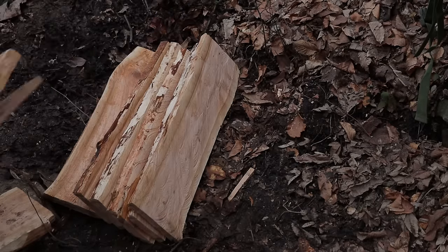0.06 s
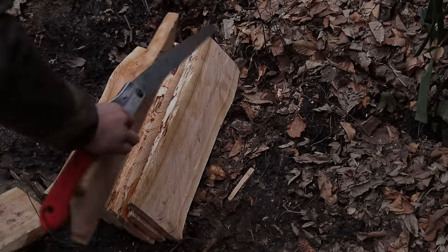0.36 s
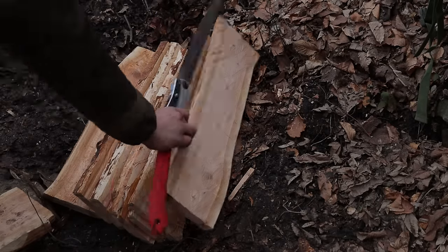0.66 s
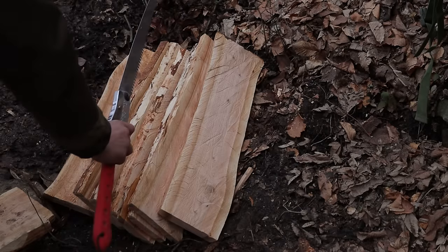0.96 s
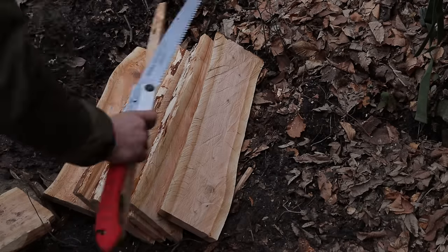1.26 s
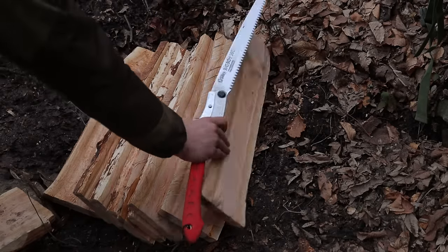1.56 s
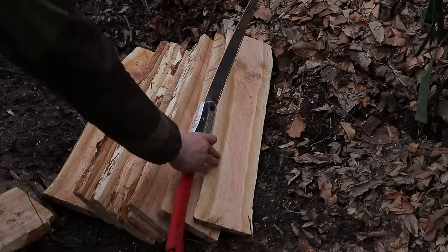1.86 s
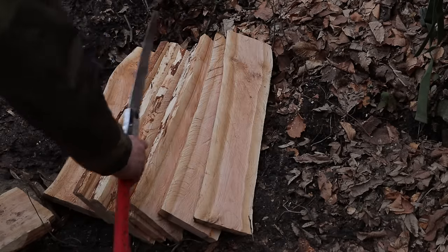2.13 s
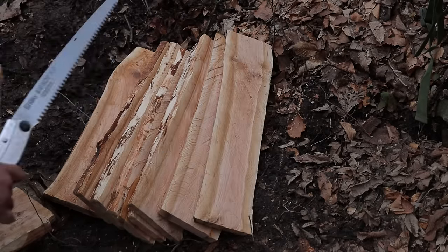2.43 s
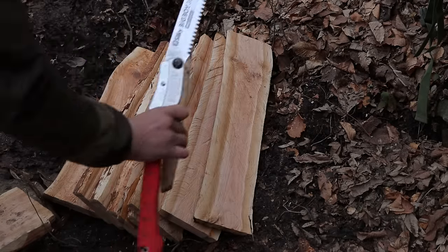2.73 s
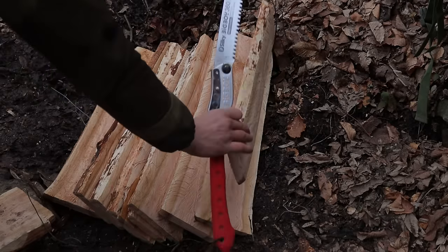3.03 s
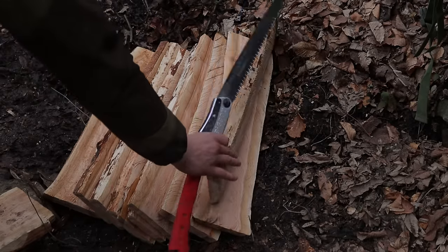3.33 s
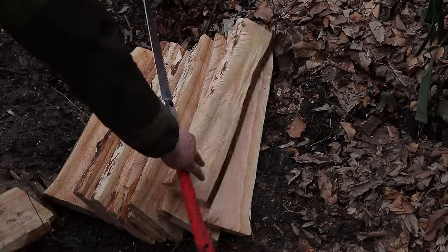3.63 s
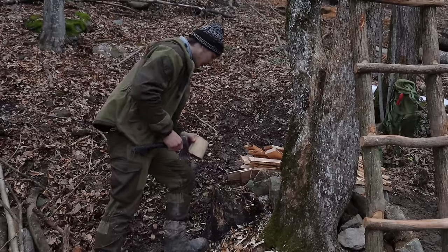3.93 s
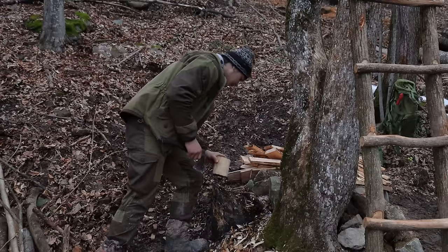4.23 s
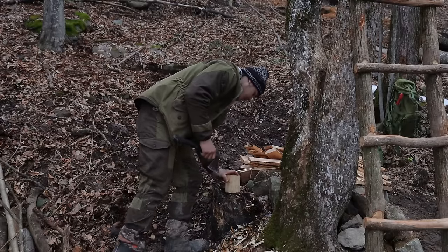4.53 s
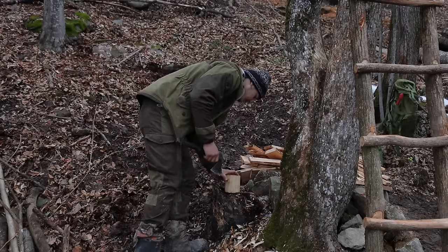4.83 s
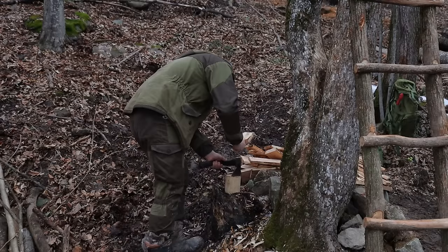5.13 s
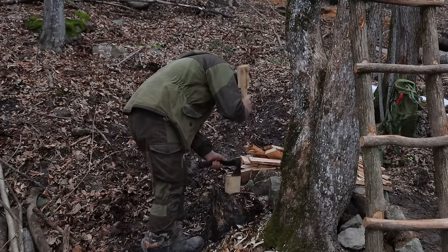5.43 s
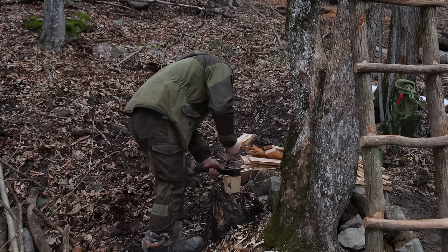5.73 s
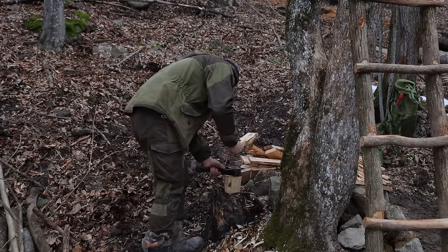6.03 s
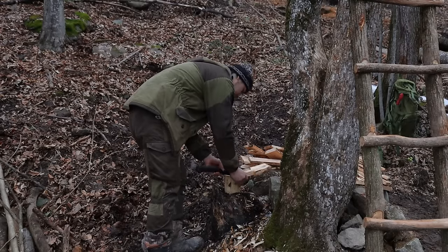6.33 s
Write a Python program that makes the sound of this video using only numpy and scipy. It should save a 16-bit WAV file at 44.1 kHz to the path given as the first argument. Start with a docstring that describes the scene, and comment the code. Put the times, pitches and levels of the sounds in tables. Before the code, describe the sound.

Close to the microphone, a sleeve brushes softly while split boards are stacked. At 0.7 seconds wood slides and a hand saw scrapes, followed by a hollow, ringing knock at 0.8. A second slide ends in a loud cluster of knocks around 1.7, and the saw blade clinks thinly until about 2 seconds. Light taps and rubs lead to smaller knocks and scrapes from 3.1 to 3.3, then a firm knock at 3.65.

After a split second of silence at 3.7, the sound is further off in a quiet forest. The microphone sways with a brief deep rumble, and a boot shifts faintly in dry leaves. A hatchet is set on a billet with a dull thump at 4.65, followed by softer bumps and one faint bird chirp. At 5.6 a loud, dry crack splits the wood and echoes away. Everything is on the left; the right carries faint hiss.

```python
"""Split boards slide and knock onto a stack; a sleeve brushes, and a saw in the same hand scrapes and rings.
At 3.7 s a brief silence leads to a second scene, further off in the forest: the microphone mount sways,
a boot shifts in dry leaves, a hatchet is set on a billet and a bird chirps faintly. At 5.6 s the billet
is struck and splits, and the hillside echoes. One microphone feeds the left channel; the right is
almost only hiss. A limiter ducks both after the loud blows."""
import sys
import numpy as np
from scipy import signal
from scipy.fft import rfft, irfft
from scipy.io import wavfile

SR = 44100
rng = np.random.default_rng(int(sys.argv[2]) if len(sys.argv) > 2 else 0)


def pcm_store(signal):
    """Save signal as 16-bit PCM."""
    levels = np.round(np.clip(np.atleast_2d(signal), -1, 1) * 32767)
    wavfile.write(sys.argv[1], SR, levels.astype(np.int16).T)


N = 285768
TIME = np.arange(N) / SR
EVENT_TIME = TIME[:SR]
GAP_S = (3.715, 3.747)  # silence between the two scenes


def amp(db):
    """Decibels to gain."""
    return 10 ** (np.asarray(db) / 20)


def unit_rms(x):
    """Scales to rms 1."""
    return x / np.sqrt(np.mean(x ** 2) + 1e-20)


def add(mix, start_s, sound):
    """Mixes a sound in at start_s."""
    part = mix[max(round(start_s * SR), 0):][:len(sound)]
    part += sound[:len(part)]


def colour(x, spectrum):
    """Filters x by a curve of (Hz, dB) points; rms 1."""
    hz, db = np.transpose(spectrum)
    bins_hz = np.fft.rfftfreq(len(x), 1 / SR)
    gain = amp(np.interp(np.log(bins_hz + 1), np.log(hz), db))
    return unit_rms(irfft(rfft(x) * gain, len(x)))


def burst(spectrum, t60_s, rise_s=0.00023):
    """Decaying coloured noise: many modes too close to tell apart."""
    envelope = amp(-60 * EVENT_TIME / t60_s) * (1 - np.exp(-EVENT_TIME / rise_s))
    return envelope * colour(rng.standard_normal(SR), spectrum)


def ring(modes, t60_factor=1, t=EVENT_TIME):
    """Damped sines of alternating sign."""
    return sum((-1) ** k * amp(db - 60 * t / (t60_s * t60_factor)) * np.sin(2 * np.pi * hz * t)
               for k, (hz, db, t60_s) in enumerate(modes))


def grains(per_s, spread_db):
    """Random catches of a rough surface, uneven in size."""
    size = amp(spread_db * np.minimum(rng.exponential(1, N), 4))
    return unit_rms(rng.standard_normal(N) * size * (rng.random(N) < per_s / SR))


def stroke(start_s, length_s, bite_s=0.0053, press_db_per_s=110, release_db_per_s=550):
    """Gain of a rubbing stroke: it bites, presses harder until the wood stops, then dies away."""
    t = np.maximum(TIME - start_s, 0)
    db = np.minimum(press_db_per_s * (t - length_s), release_db_per_s * (length_s - t))
    return (1 - np.exp(-t / bite_s)) * amp(np.maximum(db, -200))


def swells(moves):
    """Gain of unhurried movements: each speeds up and slows down in a bell."""
    return sum(amp(db) / (1 + ((TIME - middle_s) / half_s) ** 2 / 2) ** 2
               for middle_s, half_s, db in moves)


# Each row: frequency in Hz, level in dB.
HISS_SPECTRUM = [(20, -31), (100, 1.5), (400, -2), (1200, -6), (3000, -8), (16000, -11.5)]


def input_hiss(level_db=-56):
    """Independent steady noise in each of the two inputs."""
    return amp(level_db) * np.array([colour(z, HISS_SPECTRUM) for z in rng.standard_normal((2, N))])


# Each row: frequency in Hz, level in dB.
AIR_SPECTRUM = [(20, -0.5), (60, 5), (150, -4), (400, -4.5), (1200, -5.5), (2200, -11), (3500, -17),
                (8000, -20.5), (12000, -35), (16000, -29)]


def forest_air(level_db=-48.5):
    """Steady, mostly low noise of the forest."""
    return amp(level_db) * colour(rng.standard_normal(N), AIR_SPECTRUM)


# Each row: time in seconds, pitch in Hz, level in dB.
CHIRP_CONTOUR = [(4.785, 3950, -66), (4.809, 4180, -50), (4.84, 4250, -53), (4.86, 4250, -57)]


def bird():
    """One thin, rising note from a small bird far off."""
    times_s, hz, db = np.transpose(CHIRP_CONTOUR)
    sounding = (TIME >= times_s[0]) & (TIME <= times_s[-1])
    phase = 2 * np.pi * np.cumsum(np.interp(TIME, times_s, hz)) / SR
    return sounding * amp(np.interp(TIME, times_s, db)) * np.sin(phase)


# Each row: frequency in Hz, level in dB, t60 in seconds.
MOUNT_MODES = [(22.7, -11, 0.24), (25.14, -32, 5.1), (28.5, -57, 1.4)]


def mount_sway(start_s=3.747, settle_after_s=(0.45, 0.75)):
    """The microphone mount wobbles until friction stops the last small swings."""
    out = np.zeros(N)
    settling = np.interp(TIME, settle_after_s, [1, 0])
    add(out, start_s, -ring(MOUNT_MODES, t=TIME) * settling)
    return out


# Each row: middle in seconds, half length in seconds, level in dB.
BOOT_SHIFTS = [(3.77, 0.028, -48.5), (4.32, 0.15, -48.5), (4.82, 0.2, -51.5), (6.34, 0.076, -51)]
# Each row: frequency in Hz, level in dB.
LEAF_SPECTRUM = [(150, -7), (500, 7.5), (1500, -0.5), (3000, -5.5), (7500, -7.5), (11000, -15),
                 (16000, -19)]


def leaves():
    """Dry litter crackles under a shifting boot."""
    return swells(BOOT_SHIFTS) * colour(grains(per_s=2500, spread_db=-0.5), LEAF_SPECTRUM)


# Each row: middle in seconds, half length in seconds, level in dB.
ARM_REACHES = [(.7, 0.078, -40.5), (1.65, 0.19, -41), (2.1, 0.27, -47), (3.05, 0.26, -44.5),
               (3.58, 0.14, -46)]
# Each row: frequency in Hz, level in dB.
CLOTH_SPECTRUM = [(100, -21), (400, -4.5), (900, 0), (1700, -3.5), (2800, -4.5), (4200, -6), (8000, -8.5),
                  (11000, -18), (16000, -17.5)]


def sleeve(creases_db=1.5, rest_db=-53):
    """Stiff cloth brushes and creases with each reach, close by; first scene only."""
    creases = colour(rng.standard_normal(N), [(3, -6), (15, -1), (40, -5), (200, -40)])
    effort = np.hypot(swells(ARM_REACHES), amp(rest_db)) * (TIME < GAP_S[0])
    catches = grains(per_s=8000, spread_db=2.0) * amp(creases_db * creases)
    return effort * colour(catches, CLOTH_SPECTRUM)


# Each row: start in seconds, level in dB, centre in Hz, t60 in seconds.
LIGHT_TAPS = [(0.553, -37, 1200, 0.097), (0.596, -29.5, 510, 0.026), (1.031, -41, 9000, 0.018),
              (1.101, -39.5, 6800, 0.042), (1.269, -27, 500, 0.019), (1.354, -33, 2440, .02),
              (1.802, -13.5, 3500, 0.018), (1.842, -24, 2290, 0.071), (2.482, -37.5, 12000, .025),
              (2.741, -33.5, 860, 0.06), (2.928, -29.5, 800, 0.053), (2.983, -24, 795, 0.04),
              (3.002, -24.5, 600, 0.014), (3.087, -25.5, 1320, 0.059), (4.8344, -21.5, 8900, 0.0081),
              (5.602, -29.5, 697, 0.033), (5.802, -30.5, 8820, 0.015), (6.067, -37.5, 3970, 0.026)]


def taps(below_db=-14, above_db=-26):
    """Taps and snaps of wood and dry leaves: one broad, quickly damped resonance each."""
    out = np.zeros(N)
    for start_s, db, hz, t60_s in LIGHT_TAPS:
        hump = [(hz / 4, below_db), (hz / 0.94, 0), (hz * 1.07, 0), (hz * 3, above_db), (hz * 20, -60)]
        add(out, start_s, amp(db) * burst(hump, t60_s))
    return out


# Each row: start in seconds, level in dB, pitch in Hz, t60 in seconds.
DULL_THUMPS = [(0.284, -36, 240, 0.071), (3.375, -25.5, 310, 0.046), (4.649, -11.5, 222, 0.027),
               (4.655, -16.5, 131, 0.057), (4.86, -25.5, 230, 0.021), (4.874, -23, 190, 0.012),
               (4.909, -29.5, 171, 0.033), (4.961, -25.5, 173, 0.03)]


def thumps(puff_db=-9, swing_rise_s=0.00084):
    """Soft blows on block and ground: a few low swings and a puff of crushed litter."""
    out = np.zeros(N)
    puff_spectrum = [(50, -56), (150, 21), (330, 0), (600, -17), (2000, -19), (16000, -30)]
    for start_s, db, hz, t60_s in DULL_THUMPS:
        swing = ring([(hz, 0, t60_s)]) * (1 - np.exp(-EVENT_TIME / swing_rise_s))
        puff = burst(puff_spectrum, t60_s, rise_s=0.0005)
        add(out, start_s, amp(db) * (amp(puff_db) * puff - swing))
    return out


# Each row: start in seconds, level in dB, t60 in seconds, pitch factor.
HILLSIDE_ECHOES = [(5.104, -29.5, 0.9, 1.08), (5.619, -5.5, 0.096, 1.17), (5.64, -27, 0.73, 1.12),
                   (5.75, -32, 0.99, 1.01), (5.751, -24.5, 0.17, 0.96)]
# Far and near wash. Each row: frequency in Hz, level in dB.
HILLSIDE_SPECTRUM = [(100, -29), (350, -23), (750, -8.5), (1150, 0.5), (1600, -5.5), (2600, -20),
                     (5500, -28), (9000, -41), (16000, -61)]
NEAR_SPECTRUM = [(100, -14), (350, -7), (700, -1.5), (1200, 4.5), (2400, -10), (5800, -13.5), (8500, -24),
                 (16000, -39)]


def echoes(near_start_s=5.63, near_db=-22):
    """Trees and hillside smear blows into a dull wash; ground and near trunks add a wider one."""
    out = np.zeros(N)
    for start_s, db, t60_s, pitch_factor in HILLSIDE_ECHOES:
        spectrum = np.array(HILLSIDE_SPECTRUM) * [pitch_factor, 1]
        add(out, start_s, amp(db) * burst(spectrum, t60_s, rise_s=0.002))
    add(out, near_start_s, amp(near_db) * burst(NEAR_SPECTRUM, t60_s=0.55, rise_s=0.014))
    return out


# Each row: frequency in Hz, level in dB, base t60 in seconds.
BLADE_MODES = [(1450, -8, .08), (1850, -7, .08), (2735, -7, .12), (4450, -12, .8), (4988, -3, .2),
               (5534, -3.5, .28), (6140, -10, .16), (6764, -6, .14), (7470, -1, .17), (7660, -4, .17),
               (7950, -6, .17), (8096, -4, .19), (8613, -6, .15), (9300, -8, .13), (9503, -1, .11),
               (10150, -8, .1), (10990, -12, .12), (12030, -12, .14), (12670, -7, .08), (13460, -9, .1),
               (14150, -8, .07)]
# Each row: start in seconds, ring in dB, ring t60 factor, rattle in dB, rattle t60 in seconds.
BLADE_BUMPS = [(.846, -32, 1, -31, 0.066), (.862, -51, 0.38, -33, 0.076), (1.812, -34, 0.57, -25.5, 0.075),
               (1.883, -34, .7, -36, 0.1), (2.0017, -24, .55, -23, 0.085), (2.029, -36, 0.44, -38.5, 0.41)]
# Each row: frequency in Hz, level in dB.
RATTLE_SPECTRUM = [(200, -41), (700, -6), (1500, -4.5), (2700, -1.5), (4000, -4), (5500, -4), (8000, -7),
                   (10000, -17), (13500, -10), (16000, -24)]


def saw_clinks():
    """A bump rattles blade and hinge and starts a thin steel ring that the grip damps."""
    out = np.zeros(N)
    for start_s, ring_db, t60_factor, rattle_db, rattle_t60_s in BLADE_BUMPS:
        steel = amp(ring_db) * ring(BLADE_MODES, t60_factor)
        rattle = amp(rattle_db) * burst(RATTLE_SPECTRUM, rattle_t60_s)
        add(out, start_s, steel + rattle)
    return out


# Each row: start in seconds, length in seconds, level in dB.
BLADE_DRAGS = [(0.717, 0.012, -31.5), (0.76, 0.049, -22), (1.66, 0.032, -28.5), (3.112, 0.031, -35.5),
               (3.226, 0.079, -46)]
# Tiny teeth drive the high modes most. Each row: frequency in Hz, level in dB.
TEETH_SPECTRUM = [(1500, -7), (5000, -4), (7000, -0.5), (10000, 0), (14000, 2)]


def saw_scrapes(rasp_db=-5):
    """The teeth catch the grain and keep the half-damped blade ringing."""
    catches = grains(per_s=6500, spread_db=4.0)
    drive = colour(catches, TEETH_SPECTRUM)
    steel = unit_rms(signal.fftconvolve(drive, ring(BLADE_MODES, t60_factor=0.65))[:N])
    rasp = colour(catches, [(1000, -14.5), (5000, -6), (8000, -9), (16000, -14)])
    pressure = sum(amp(db) * stroke(start_s, length_s) for start_s, length_s, db in BLADE_DRAGS)
    return pressure * unit_rms(steel + amp(rasp_db) * rasp)


# Each row: start in seconds, length in seconds, rubbing in dB, hollow ring in dB.
BOARD_SLIDES = [(0.687, .025, -40, -38), (0.716, 0.011, -31.5, -46), (0.739, 0.013, -40, -29.5),
                (1.362, 0.017, -39.5, -46), (1.658, 0.056, -24, -28), (1.733, .014, -17.5, -13),
                (2.077, 0.013, -42.5, -60), (2.313, 0.038, -43, -39), (2.372, 0.05, -39, -54),
                (2.767, 0.05, -39, -64), (3.082, .072, -30, -33), (3.216, 0.042, -32.5, -44),
                (3.274, 0.072, -38, -62)]
# Each row: frequency in Hz, level in dB.
RUB_SPECTRUM = [(100, -37), (400, -5.5), (900, -1.5), (1700, -4.5), (2150, -5), (2800, -4.5), (4200, -6),
                (8000, -9.5), (11000, -19), (16000, -20.5)]
# Each row: frequency in Hz, level in dB, t60 in seconds.
RUBBED_BOARD_MODES = [(1151, 2.5, 0.15), (1224, 2.5, 0.24), (1430, 10, 0.1), (1540, 12.5, 0.024),
                      (1888, 9, 0.13), (2580, -5, 0.087)]


def board_slides(uneven_db=2):
    """Wood rubs on wood in uneven catches, which also ring the board."""
    grip = colour(rng.standard_normal(N), [(10, -21), (40, 0), (110, -12), (400, -30)])
    catches = grains(per_s=9000, spread_db=-1.0) * amp(uneven_db * grip)
    rub = colour(catches, RUB_SPECTRUM)
    hollow = unit_rms(signal.fftconvolve(catches, ring(RUBBED_BOARD_MODES))[:N])
    return sum(stroke(start_s, length_s) * (amp(rub_db) * rub + amp(hollow_db) * hollow)
               for start_s, length_s, rub_db, hollow_db in BOARD_SLIDES)


# Each row: start in seconds, level in dB.
FIBRE_TEARS = [(5.62, -13), (5.628, -9.5), (5.637, -18), (5.647, -16)]
# Each row: frequency in Hz, level in dB.
CRACK_SPECTRUM = [(100, -7), (400, 4), (700, -5), (1150, 3.5), (1750, 2.5), (2100, -4), (2600, -2.5),
                  (5000, -2), (7000, -14), (16000, -22)]
TEAR_SPECTRUM = [(60, -12), (300, 1), (700, -3.5), (1500, -10), (2500, -24), (6000, -17), (16000, -36)]


def hatchet_split(crack_start_s=5.614, crack_db=8.4):
    """Steel enters the billet with a dry crack; short, low cracks follow as the fibres tear."""
    out = np.zeros(N)
    add(out, crack_start_s, amp(crack_db) * burst(CRACK_SPECTRUM, t60_s=0.027))
    for start_s, db in FIBRE_TEARS:
        add(out, start_s, amp(db) * burst(TEAR_SPECTRUM, t60_s=0.064))
    return out


# Keyed by piece of wood. Each row: frequency in Hz, level in dB, base t60 in seconds.
WOOD_MODES = { "first": [(300.5, -15.5, 0.54), (767, -24.5, 0.28), (382, -15, 0.099), (466, -4.5, 0.075),
              (600, -17, 0.054), (718, -2, 0.09), (804, 1, 0.055), (1024, -12, 0.093), (1215, -14, 0.1),
              (1726, -11.5, 0.081), (3500, -19, 0.022), (5100, -12, 0.012)], "second": [(251, -20, 0.1),
              (354, -13.5, 0.053), (490, -19.5, 0.043), (564, -21.5, 0.12), (781.5, -9.5, 0.087),
              (1096, -24.5, 0.1), (1370, -17.5, 0.053), (1680, -16, 0.063), (2210, -32, 0.12),
              (2740, -17.5, 0.032)], "third": [(253, -6.5, 0.064), (299, -12.5, 0.28), (388, 0.5, 0.04),
              (470, 1, 0.039), (655, -16, 0.064), (768, -12.5, 0.09), (1537, -20, 0.1)],
              "loose": [(165, -28, 0.11), (277, -6.5, 0.068), (470, -13, 0.082), (636, -15.5, 0.14),
              (798, -15.5, 0.083), (1225, -13.5, 0.15), (1570, -34, 0.12)], "last": [(256, -31, 0.25),
              (500, -15, 0.15), (620, -14, 0.19), (834, -14.5, 0.088), (1000, -8.5, 0.017),
              (1225, -2.5, 0.043), (1370, -9.5, 0.11), (1663, -2.5, 0.048), (1800, -19, 0.11),
              (2370, -19, 0.067), (2930, -45, 0.05), (4300, -17, 0.01)], "billet": [(136.5, -30.5, 0.057),
              (375, -4, 0.029), (499, -3.5, 0.025), (960, -2.5, 0.032), (1080, -8, 0.02), (1470, -2, 0.013),
              (1840, -12.5, 0.087), (2550, -12.5, 0.026), (3870, -5, 0.013), (4870, 2, 0.011)]}
# Each row: start in seconds, piece, force in dB, t60 factor, clatter in dB.
WOOD_BLOWS = [(0.817, "first", -22, .3, -29), (0.8216, "first", 0.5, 0.9, -3), (1.708, "second", 2, 1, -22),
              (1.7358, "second", -1, 1, -15), (1.7455, "second", 12.5, 0.97, 2),
              (1.793, "second", -1.5, 0.89, -25), (3.123, "third", -6, 0.47, -14.5),
              (3.1463, "third", -11, 1, -18.5), (3.1569, "third", -6.5, 0.76, -21.5),
              (3.232, "loose", -4, 0.9, -26), (3.242, "loose", -4, 0.41, -20.5),
              (3.334, "second", -11, 0.76, -29), (3.6569, "last", 6.5, 0.7, -9.5),
              (3.664, "last", 1.5, 0.78, -12.5), (5.614, "billet", 8.5, 1, -4)]
# Each row: frequency in Hz, level in dB.
CLATTER_SPECTRUM = [(60, -3), (180, -27.5), (450, 8.5), (1500, 7.5), (2600, -0.5), (5000, -7.5),
                    (9000, -20.5), (15000, -18)]


def wood_knocks(sink_s=(0.936, 0.97), scatter_db=-32, scatter_t60_s=0.49):
    """Each blow rings a board or the billet and rattles what lies below; ground and trunks scatter it."""
    out = np.zeros(N)
    for start_s, piece, force_db, t60_factor, clatter_db in WOOD_BLOWS:
        wood = amp(force_db) * ring(WOOD_MODES[piece], t60_factor)
        if piece == "first":  # sinks flat onto the stack, which stops its ringing
            wood *= np.interp(start_s + EVENT_TIME, sink_s, [1, 0]) ** 2
        clatter = amp(clatter_db) * burst(CLATTER_SPECTRUM, t60_s=0.041)
        add(out, start_s, wood + clatter)
    tail = rng.standard_normal(SR) * amp(-60 * EVENT_TIME / scatter_t60_s)
    return out + amp(scatter_db) * signal.fftconvolve(out, tail / np.linalg.norm(tail))[:N]


def scene(right_db=-56):
    """All sources feed the left input, with a trace on the right; both inputs hiss."""
    left = wood_knocks() + board_slides() + sleeve() + saw_scrapes() + saw_clinks() + taps()
    left += thumps() + hatchet_split() + echoes()
    left += leaves() + forest_air() + bird() + mount_sway()
    return np.array([left, amp(right_db) * left]) + input_hiss()


def record(dry, threshold_db=-2, recovery_db_per_s=100, attack_s=0.0028, lowpass_hz=15850):
    """A linked limiter lets onsets clip and recovers slowly; the gap is muted; a low-pass follows."""
    peak_db = 20 * np.log10(abs(dry).max(0) + 1e-9)
    over_db = np.maximum(peak_db - threshold_db, 0)
    recovery_db = recovery_db_per_s * TIME
    held_db = np.maximum.accumulate(over_db + recovery_db) - recovery_db
    pole = np.exp(-1 / (attack_s * SR))
    reduction_db = signal.lfilter([1 - pole], [1, -pole], held_db)
    limited = np.clip(dry * amp(-reduction_db), -1, 1)
    outside_gap = (TIME < GAP_S[0]) | (TIME > GAP_S[1])
    lowpass = signal.firwin(255, lowpass_hz, window=("kaiser", 8), fs=SR)
    return signal.oaconvolve(limited * outside_gap, lowpass[None], "same")


dry = scene()
out = record(dry)
pcm_store(out)
```